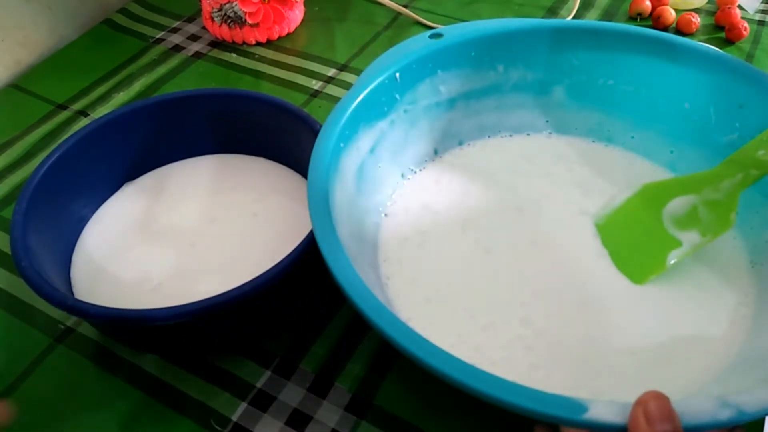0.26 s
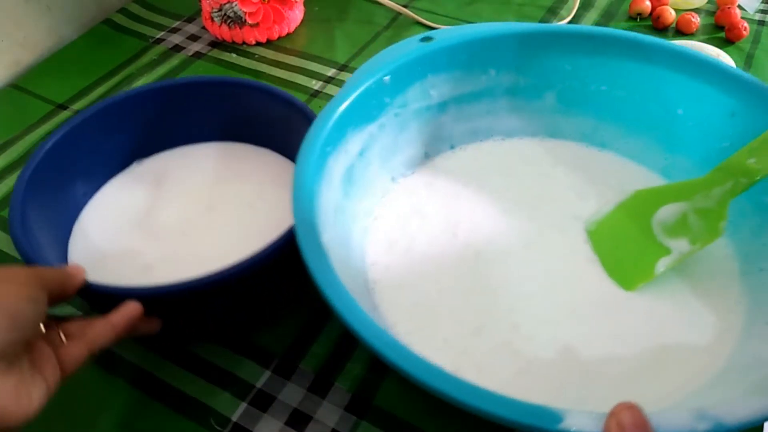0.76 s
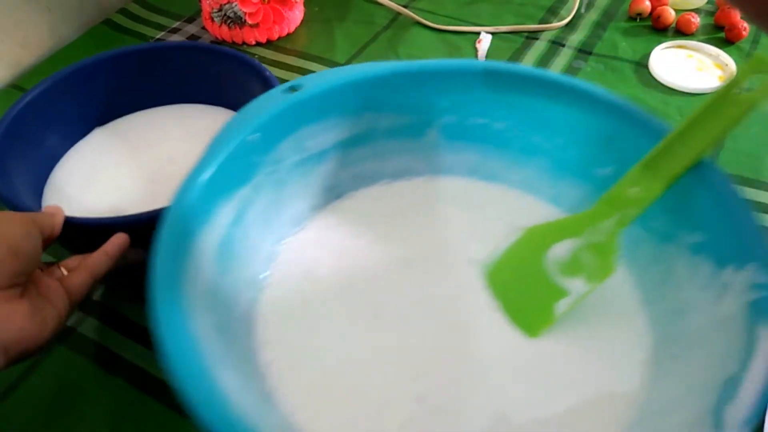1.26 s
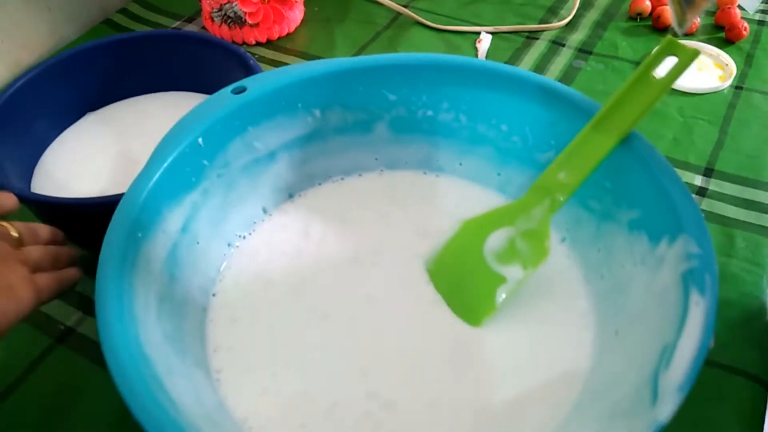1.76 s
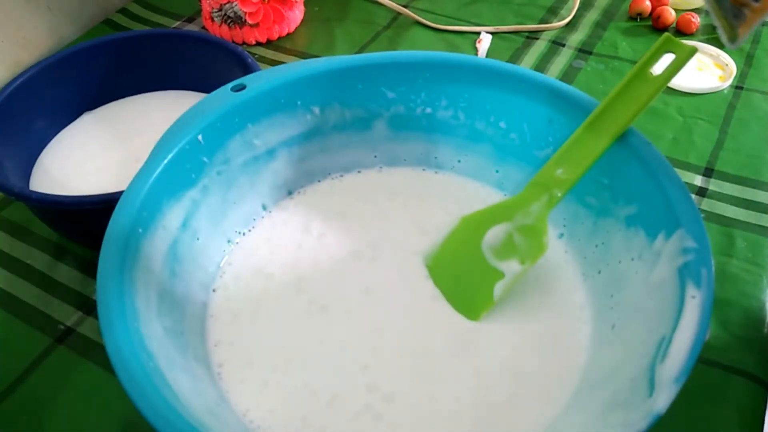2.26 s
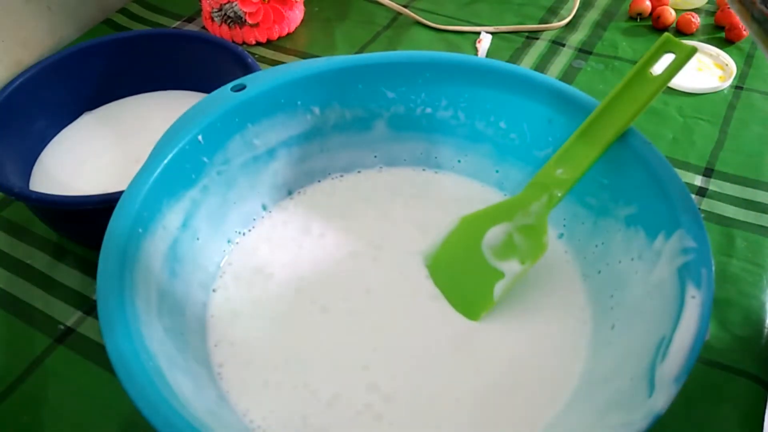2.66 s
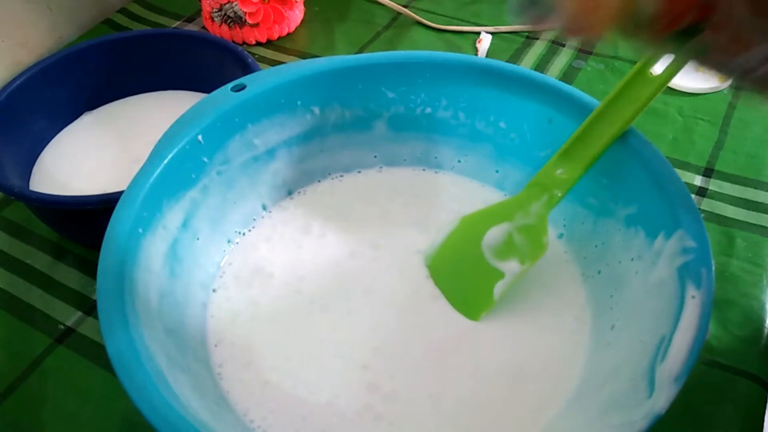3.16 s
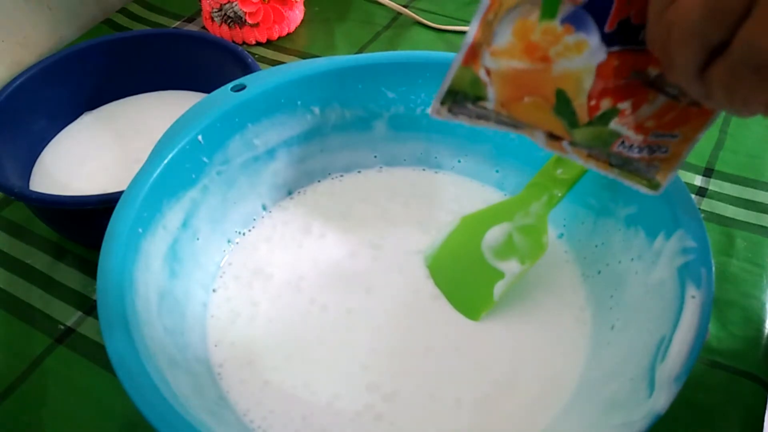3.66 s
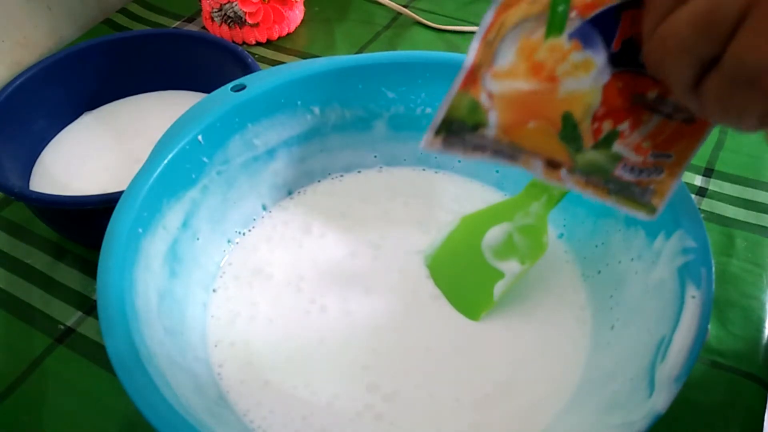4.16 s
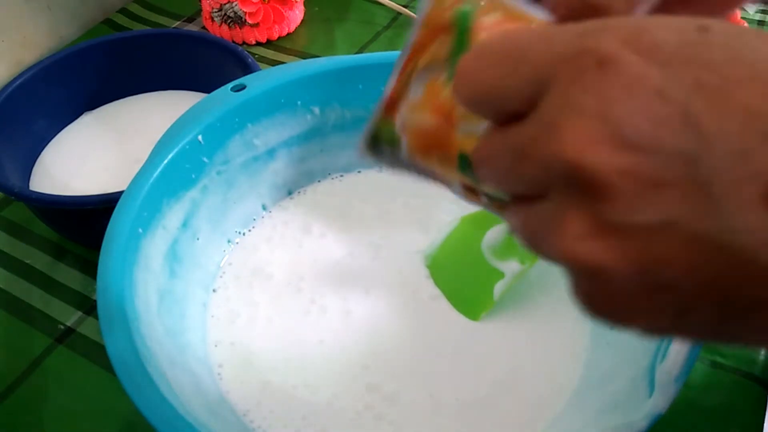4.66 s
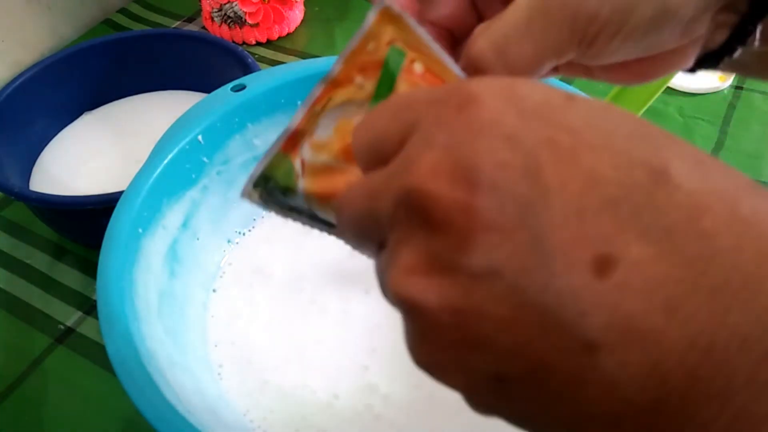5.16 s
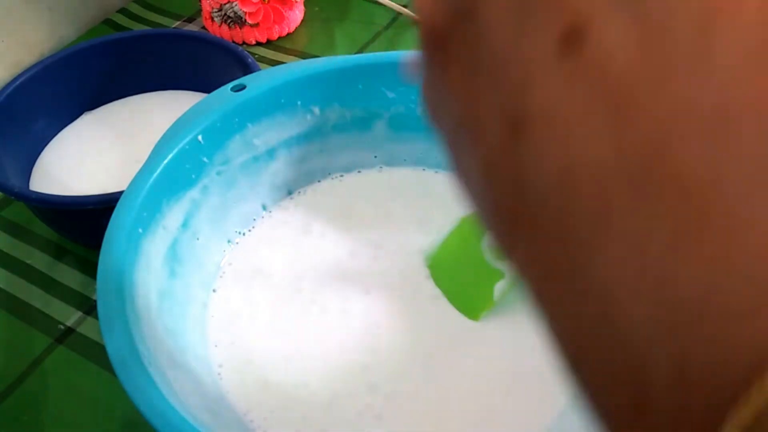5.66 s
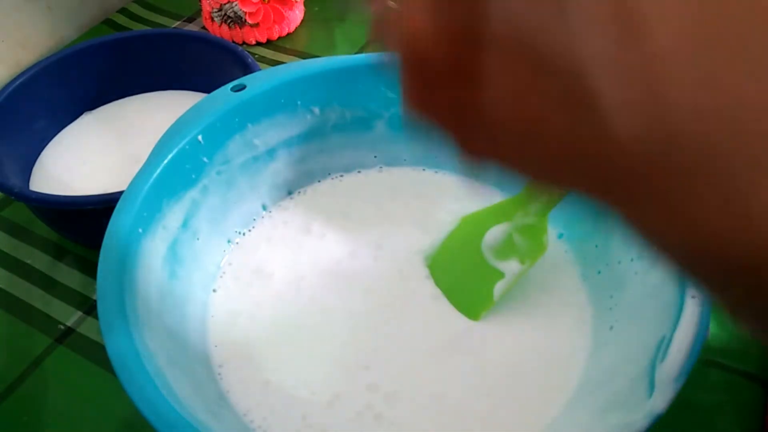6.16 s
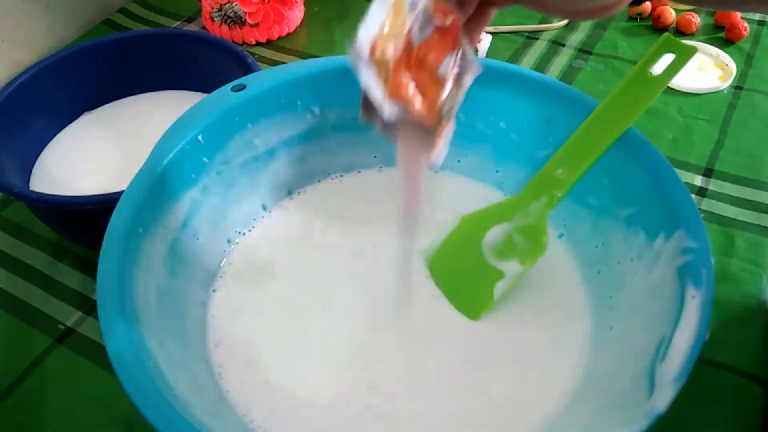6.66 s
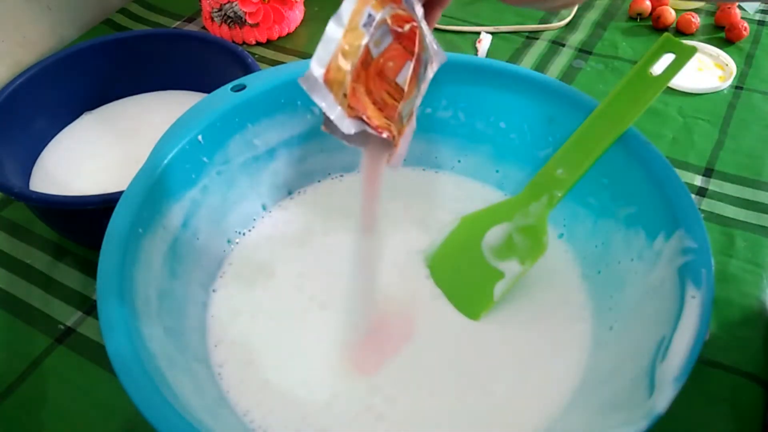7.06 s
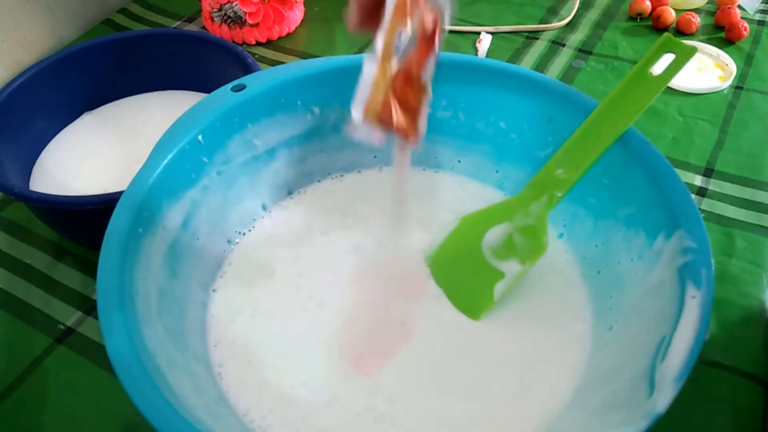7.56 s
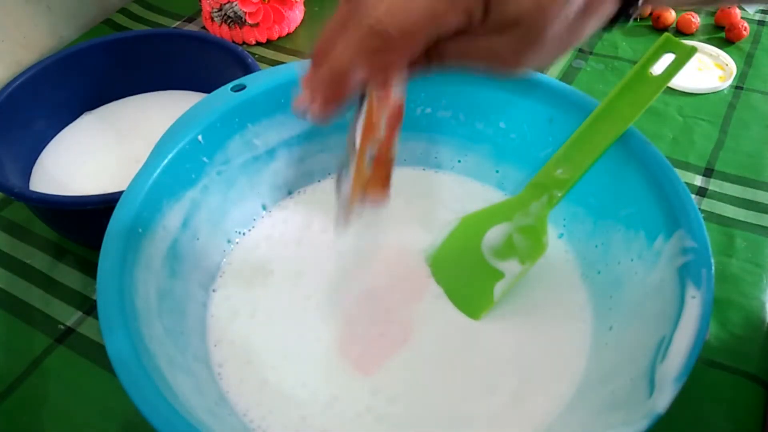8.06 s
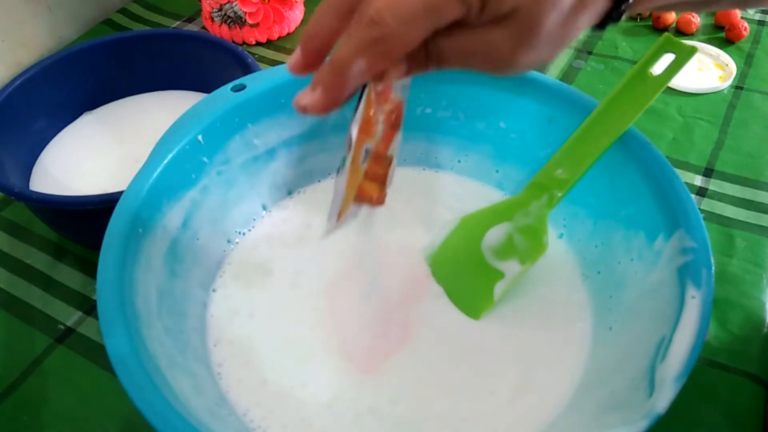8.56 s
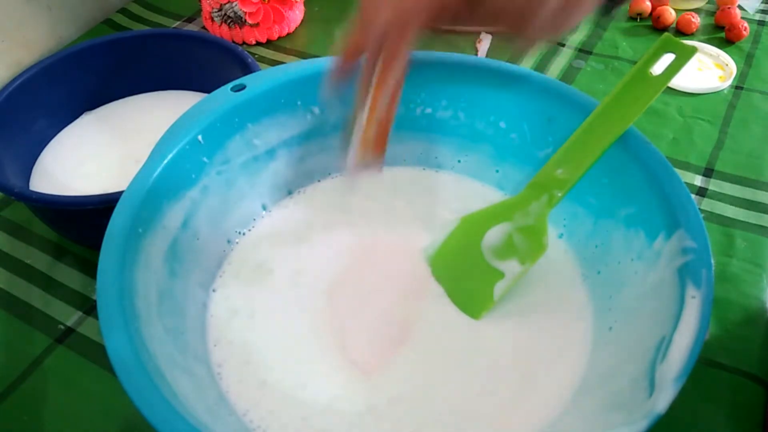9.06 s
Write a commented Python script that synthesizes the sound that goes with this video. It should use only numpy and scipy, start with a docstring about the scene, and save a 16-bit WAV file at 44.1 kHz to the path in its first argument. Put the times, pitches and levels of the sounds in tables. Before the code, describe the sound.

Short hollow bowl drag, busy bright foil crinkling and tearing, then fine powder streaming and being flicked from the sachet in a quiet kitchen.

```python
"""Bowl, foil sachet and powder

A plastic bowl is dragged over a mat: rough friction noise excites the modes of its walls.
A foil sachet is handled and torn open: each crease is an impulse that rings short modes of the sheet.
Powder streams out and is flicked out: dense grain impacts hiss, drum on the pouch and sound its spout.
A quiet kitchen adds reverberation, rumble and air; the whole is bright, with a strong lift near 9 kHz."""
import sys
import numpy as np
from scipy import signal
from scipy.fft import rfft, irfft, next_fast_len
from scipy.io import wavfile
from scipy.ndimage import uniform_filter1d, map_coordinates

SR = 44100
rng = np.random.default_rng(int(sys.argv[2]) if len(sys.argv) > 2 else 0)


def to_wav(sig):
    """Store sig (one row per channel, or 1-D mono) as 16-bit WAV at the path in sys.argv[1].

    Samples outside -1..1 are clipped; the rate is SR.
    """
    pcm = np.clip(np.atleast_2d(sig), -1, 1) * 32767
    pcm = np.round(pcm).astype(np.int16)
    wavfile.write(sys.argv[1], SR, pcm.T)  # frames by channels


N = 409688  # length [samples]


def amp(db):
    """Decibel law: level [dB] to amplitude gain."""
    return 10 ** (np.asarray(db) / 20)


def unit(x):
    """Normalization of a signal to rms 1."""
    return x / np.sqrt(np.mean(x ** 2) + 1e-20)


def along(points, hz):
    """Interpolation of (frequency [Hz], value) points on a logarithmic frequency axis."""
    f, v = np.transpose(points)
    return np.interp(np.log(hz + 1), np.log(f + 1), v)


def gains(rows):
    """Level envelopes: one gain per sample for each dB column, near silence outside the table."""
    times, *columns = np.transpose(rows)
    t = np.arange(N) / SR
    return [amp(np.interp(t, times, levels, left=-150, right=-150)) for levels in columns]


def swell(start, length, rise_db, fall_db):
    """Exponential growth to gain 1, a hold and exponential decay; slopes in dB/s, times in s."""
    t = np.arange(N) / SR
    before = np.clip(start - t, 0, None)
    after = np.clip(t - start - length, 0, None)
    return amp(-rise_db * before - fall_db * after)


def wobble(rate):
    """Slow random modulation: a smooth curve through normal draws, rate knots a second."""
    knots = rng.standard_normal(int(N * rate / SR) + 4)
    return map_coordinates(knots, [np.arange(N) * rate / SR])


def filtered(x, response):
    """Linear filtering: the spectrum of x times a complex response of frequency."""
    m = next_fast_len(N + SR // 2)
    return irfft(rfft(x, m) * response(np.fft.rfftfreq(m, 1 / SR)), m)[..., :N]


def colour(points):
    """Spectral shaping: the response of (frequency [Hz], gain [dB]) points."""
    return lambda hz: amp(along(points, hz))


def resonances(modes):
    """Modal sum: damped resonators (centre [Hz], width [Hz], gain [dB]) of alternating sign."""
    def response(f):
        total = 0
        for k, (centre, width, db) in enumerate(modes):
            damping = 1j * f * width
            total = total + (-1) ** k * amp(db) * damping / (centre * centre - f * f + damping)
        return total
    return response


def band(x, hz, ratio):
    """Band-pass filtering: x from hz / ratio to hz * ratio, rms 1."""
    b, a = signal.butter(2, [hz / ratio, hz * ratio], "band", fs=SR)
    return unit(signal.lfilter(b, a, x))


def struck(shape, carrier):
    """Energy conservation: the carrier under an envelope of height 1 keeps that envelope's energy."""
    return unit(shape * carrier) * np.sqrt(np.mean(shape ** 2)) / shape.max()


def crackle(rate, spread_db, life_s, smooth):
    """Shot noise: random impacts, rate a second, roughen a steady noise; the sum has rms 1."""
    sizes = amp(spread_db * np.clip(rng.standard_normal(N), -3, 2))
    hits = (rng.random(N) < rate / SR) * sizes
    bursts = signal.lfilter([1], [1, -np.exp(-1 / (life_s * SR))], hits)
    return unit((smooth + unit(bursts)) * rng.standard_normal(N))


def patchy(x, depth_db):
    """Time-frequency modulation: patches of random gain, some hundred Hz by some ten ms."""
    z = signal.stft(x, nperseg=512)[2]
    field = uniform_filter1d(rng.standard_normal(z.shape), size=8, axis=0)
    field = uniform_filter1d(field, size=8, axis=1)
    return signal.istft(z * amp(depth_db * unit(field)), nperseg=512)[1][:N]


def burst(t, lag, rise, t60):
    """Impact envelope: an exponential rise from the lag, then a 60 dB decay in t60 (all in s)."""
    return (t > lag) * (1 - np.exp(-np.abs(t - lag) / rise)) * amp(-60 * (t - lag) / t60)


# Creases of the foil and catches of the bowl:
# (time [s], crack level [dB], level of the sheet's body [dB], pitch of the sheet [Hz])
CREASES = [(0.606, -51, -40, 1930), (0.733, -52, -47, 1540), (0.998, -29.5, -28.5, 2530),
           (1.168, -23, -37, 3280), (1.229, -27, -46, 1030), (1.267, -14.5, -33, 1440),
           (1.3, -50, -35, 1500), (1.326, -31.5, -31, 3160), (1.408, -52, -40, 990),
           (1.464, -16.5, -28.5, 3000), (1.472, -18.5, -34, 1380), (1.479, -11.5, -29.5, 2030),
           (1.671, -18, -32, 3060), (1.717, -30, -48, 2320), (2.069, -50, -52, 3020),
           (2.094, -39.5, -47.5, 950), (2.158, -61, -46.5, 1040), (2.208, -56, -43, 940),
           (2.231, -50, -44, 1110), (2.26, -46, -41.5, 1000), (2.322, -51, -51.5, 3200),
           (2.421, -47.5, -46, 1060), (2.537, -68, -46, 1570), (2.585, -48.5, -39, 1610),
           (2.649, -71, -45.5, 1360), (2.714, -31.5, -37, 1390), (2.789, -30, -33, 1350),
           (2.809, -22.5, -45, 1430), (2.831, -50, -40, 1280), (2.838, -30, -35.0, 1100),
           (2.87, -38, -33, 1210), (2.891, -42, -35.5, 1020), (2.912, -22.5, -27.5, 4000),
           (2.942, -10.5, -30.5, 1480), (2.962, -45, -38, 1700), (2.969, -24.5, -34.5, 1940),
           (3.007, -34, -37, 2160), (3.02, -11, -31, 3970), (3.033, -23.5, -30, 2460),
           (3.038, -21, -35.5, 1210), (3.069, -10, -24.5, 1890), (3.096, -21, -33, 3230),
           (3.108, -36, -33, 1120), (3.16, -23.5, -31, 2810), (3.223, -30.5, -50, 2400),
           (3.466, -35, -34, 1750), (3.473, -36, -32.5, 1640), (3.503, -21, -23.5, 1440),
           (3.534, -30, -38, 875), (3.554, -38, -29.5, 2800), (3.566, -42, -29.5, 1700),
           (3.574, -18.5, -25, 2880), (3.59, -36, -35, 3030), (3.615, -19.5, -24, 2420),
           (3.624, -45, -36, 1400), (3.67, -22.5, -28.5, 2600), (3.786, -30, -30.5, 2950),
           (3.816, -41, -32.5, 1052), (4.01, -78.5, -41, 1400), (4.067, -31.5, -41.5, 1050),
           (4.082, -29.5, -34.5, 1720), (4.152, -21.5, -39.5, 3070), (4.183, -48.5, -34.5, 2700),
           (4.194, -13, -31, 1530), (4.218, -29.5, -33, 3000), (4.239, -24, -34.5, 2370),
           (4.266, -23, -52, 1870), (4.277, -27, -42, 1510), (4.285, -19.5, -38, 2620),
           (4.296, -26.5, -33, 1800), (4.31, -7.5, -30, 2520), (4.318, -14.5, -25, 2780),
           (4.412, -28.5, -37, 3450), (4.425, -50.5, -39, 1220), (4.431, -18.5, -28, 2580),
           (4.447, -39, -25.5, 3440), (4.452, -48, -37, 980), (4.464, -26, -21, 2600),
           (4.474, -44, -25, 1950), (4.479, -2.5, -21.5, 1550), (4.495, -35, -24.5, 1940),
           (4.577, -17.5, -26.5, 2820), (4.596, -18, -34, 2130), (4.644, -3, -17, 3830),
           (4.657, -12.5, -53, 2300), (4.668, -18, -20, 1330), (4.833, -28.5, -35, 2480),
           (4.859, -33, -36, 2330), (4.879, -26, -29.5, 1300), (4.902, -24, -39.5, 1020),
           (4.911, -19.5, -33.5, 2200), (4.951, -26.5, -45, 2360), (5.009, -37.5, -65, 2000),
           (5.019, -14.5, -28, 1680), (5.029, -23, -37, 1480), (5.042, -25, -30.5, 2060),
           (5.049, -53, -33.5, 1260), (5.054, -16, -33.5, 1340), (5.157, -21, -21.5, 2150),
           (5.168, -17.5, -20.5, 3620), (5.184, -52.5, -32.5, 1370), (5.223, -15, -26.5, 2550),
           (5.278, -34, -36.5, 3360), (5.38, -32, -50, 3430), (5.435, -36, -95, 890),
           (5.463, -25, -40.5, 2120), (5.477, -25, -27, 1990), (5.49, -24.5, -30.5, 1890),
           (5.563, -39, -38, 2000), (5.683, -65, -46, 1800), (5.693, -38.5, -41.5, 2390),
           (5.706, -26, -29, 1600), (5.716, -43, -33.5, 860), (5.735, -42, -33.5, 2200),
           (5.823, -30, -61, 1980), (5.876, -26, -35, 1370), (5.882, -17, -28.5, 3460),
           (5.955, -35, -38, 2450), (5.985, -55, -44, 2330), (6.002, -36, -62, 3080),
           (6.053, -21, -29, 2380), (6.061, -11, -33.5, 1110), (6.074, -37, -35.5, 1100),
           (6.08, -31, -37, 1530), (6.091, -38, -34, 1970), (6.109, -28, -27, 3000),
           (6.201, -44, -32, 2100), (6.682, -57, -56, 2730), (6.804, -36, -48, 910),
           (7.359, -35, -39, 2880), (7.438, -30.5, -79, 2220.0), (7.53, -38, -42.5, 1800),
           (7.544, -30, -47, 1320), (7.812, -42, -35, 2000), (7.856, -53, -48, 990),
           (7.87, -26.5, -27, 1610), (8.027, -54, -33, 1566), (8.797, -22, -57, 3075),
           (9.077, -48.5, -41.5, 2040), (9.139, -35, -70.5, 2130.0), (9.198, -15.5, -35, 1220),
           (9.21, -28, -31.5, 2640)]
# Spectrum of the bright crack: (frequency [Hz], gain [dB])
CRACK_SPECTRUM = [(1500, -34), (3000, -12.5), (5000, -9.5), (7000, -6.5), (9000, -5.5), (15000, -13)]
# Spectrum of the sheet's body: (frequency [Hz], gain [dB])
SHEET_SPECTRUM = [(250, -17.5), (500, -1), (1000, 0.5), (1500, -1), (2500, -3), (4000, -7.5), (6000, -11),
                  (9000, -13.5)]


def snaps():
    """Buckling: a crease gives way within a millisecond, cracks brightly and rings short sheet modes."""
    crack, body = np.zeros((2, N + SR))
    t = np.arange(SR // 20) / SR
    for s, crack_db, body_db, hz in CREASES:
        crack_noise, sheet_noise = rng.standard_normal((2, len(t)))
        lags, sizes, ratios = rng.random((3, 3))
        # weaker cracks 1 to 4 ms later
        after = sum(0.3 * size * burst(t, 0.001 + 0.003 * lag, 0.0003, 0.01) for lag, size in zip(lags, sizes))
        sharp = 1.3 * burst(t, 0, 0.0002, 0.0055)
        tail = 0.13 * burst(t, 0, 0.0015, 0.04)
        bright = struck(sharp + after + tail, crack_noise)

        upper = sum(0.54 * size * np.sin(2 * np.pi * hz * (0.88 + 1.5 * ratio) * t)
                    for size, ratio in zip(sizes, ratios))
        ring = np.sin(2 * np.pi * hz * t) + upper + 0.84 * band(sheet_noise, hz, 2.08)
        # an air pocket in the pouch [4050 Hz], rung by each crease to a random degree
        pocket = amp(-8) * ratios[0] * burst(t, 0.002, 0.004, 0.035) * np.sin(2 * np.pi * 4050 * t)
        dull = struck(burst(t, 0, 0.0006, 0.011) + 0.3 * after, ring) + pocket

        start = round(s * SR)
        crack[start:][:len(t)] += amp(crack_db) * bright
        body[start:][:len(t)] += amp(body_db) * dull
    return filtered(crack, colour(CRACK_SPECTRUM)) + filtered(body, colour(SHEET_SPECTRUM))


# Separate grips of the fingers on the foil:
# (start [s], length [s], rustle level [dB], level of the sheet's body [dB])
FOIL_GRIPS = [(2.228, 0.082, -78, -74), (2.791, 0.14, -55, -55), (3.009, 0.17, -50, -50.5),
              (3.533, 0.15, -52, -51), (4.2, 0.18, -55.5, -54.5), (4.468, 0.1, -50.5, -55),
              (4.664, 0.26, -54.5, -52.5), (5.003, 0.21, -75, -61), (5.24, 0.049, -55, -68),
              (5.481, 0.035, -57, -55), (5.728, 0.069, -77, -55.5), (5.88, 0.16, -60.5, -67),
              (6.073, 0.13, -56.5, -59.5), (6.218, 0.059, -65, -63)]
GRIP_DB_PER_S, LET_GO_DB_PER_S = 284, 210  # a grip tightens, then the foil falls quiet


def hands():
    """Superposition of many small creases that crackle between the loud ones."""
    rustle, body = np.zeros((2, N))
    for s, length, rustle_db, body_db in FOIL_GRIPS:
        grip = swell(s, length, GRIP_DB_PER_S, LET_GO_DB_PER_S)
        rustle += amp(rustle_db) * grip
        body += amp(body_db) * grip
    fine = crackle(300, spread_db=6, life_s=0.0015, smooth=0.7)
    coarse = crackle(170, spread_db=7, life_s=0.002, smooth=0.8)
    bright = rustle * unit(filtered(fine, colour(CRACK_SPECTRUM)))
    return bright + body * unit(filtered(coarse, colour(SHEET_SPECTRUM)))


# Powder running out: (time [s], hiss level [dB])
POWDER_STREAM = [(6.3, -61.5), (6.4, -65.5), (6.46, -59), (6.59, -56.5), (6.67, -59.5), (6.95, -46),
                 (7.2, -52.5), (7.61, -60.5), (7.95, -54), (8.08, -61), (8.12, -88)]
# Jolts that throw the powder against the foil: (time [s], surge level [dB], trickle after it [s])
POWDER_JOLTS = [(7.651, -49.5, 0.01), (7.811, -48.5, 0.098), (8.02, -56.5, 0.033), (8.127, -42, .05),
                (8.196, -35.5, .18), (8.466, -35.5, 0.082), (8.521, -33, 0.22), (8.804, -48, 0.049),
                (8.849, -38.5, 0.13), (8.907, -57, 0.03), (9.205, -57, 0.11)]
THROW_DB_PER_S, SURGE_S, SETTLE_DB_PER_S = 747, 0.016, 445  # a surge: up, at its height, down
# stragglers, relative to the surge, thin out; after the trickle the stop slope adds to the thinning
TRICKLE_DB, THINS_DB_PER_S, STOP_DB_PER_S = -9.5, 75, 496


def powder_flow():
    """Granular flow: the stream, a surge at every jolt and the stragglers behind it."""
    flow = gains(POWDER_STREAM)[0]
    for s, db, trickle in POWDER_JOLTS:
        surge = swell(s - SURGE_S / 2, SURGE_S, THROW_DB_PER_S, SETTLE_DB_PER_S)
        thinning = swell(s, 0, THROW_DB_PER_S, THINS_DB_PER_S)
        stragglers = thinning * swell(0, s + trickle, 0, STOP_DB_PER_S)
        flow = flow + amp(db) * (surge + amp(TRICKLE_DB) * stragglers)
    return flow


# Spectrum of the ticking grains: (frequency [Hz], relative level [dB])
GRAIN_SPECTRUM = [(1500, -41.5), (3000, -14.5), (5000, -8.5), (7000, -2), (9000, 0.5), (15000, -3.5)]
# Modes of the pouch panels: (frequency [Hz], width [Hz], relative level [dB])
POUCH_MODES = [(1093, 59, 10.5), (1640, 310, 10), (2290, 490, 12), (3440, 2300, 5)]
# Air in the torn pouch, one pass of two: (frequency [Hz], width [Hz], relative level [dB])
SPOUT_MODES = [(2110, 230, 1), (2540, 250, 4.5), (2770, 250, 9), (4280, 310, -3)]
# Air in the spout sounding: (time [s], level before random flutter [dB])
SPOUT_LEVEL = [(6.62, -95), (6.7, -72), (6.97, -60), (7.2, -70.5), (7.5, -78)]


def powder():
    """Impact excitation: dense grains tick on the foil, drum on the pouch and sound the spout's air."""
    flow = powder_flow()
    grains = amp(0.98 * wobble(70)) * crackle(3200, spread_db=4, life_s=0.0006, smooth=1.2)
    ticking = unit(patchy(filtered(grains, colour(GRAIN_SPECTRUM)), depth_db=1.5))
    # each panel of the pouch comes and goes as the foil bends
    pouch = sum(amp(3.5 * wobble(40)) * filtered(grains, resonances([mode])) for mode in POUCH_MODES)
    # harder shakes drum more than they hiss
    drum = amp(1.0) * flow ** 1.335 * unit(pouch)
    spout = resonances(SPOUT_MODES)
    flutter = amp(3 * wobble(28))
    whistle = gains(SPOUT_LEVEL)[0] * flutter * unit(filtered(grains, lambda f: spout(f) ** 2))
    return flow * ticking + drum + whistle


# Bowl sliding on the mat: (time [s], scrape level [dB], level of the bowl's body [dB])
BOWL_SLIDE = [(0.5, -99, -85), (0.64, -68, -71), (0.766, -60.5, -65.5), (0.898, -57.5, -57),
              (1.146, -52.5, -48), (1.34, -54, -44.5), (1.63, -57.5, -57), (1.808, -65, -65),
              (1.95, -109, -102)]
# Modes of the bowl's walls: (frequency [Hz], width [Hz], relative level [dB])
BOWL_MODES = [(298, 43, 3), (436, 29, 4), (748, 170, -4.5), (1004, 134, -3), (1460, 910, -9)]


def drag():
    """Friction excitation: the weave of the mat scrapes the base and shakes the bowl's walls."""
    scrape, shake = gains(BOWL_SLIDE)
    rub = crackle(1800, spread_db=11, life_s=0.002, smooth=2.4)
    scrape_spectrum = [(1000, 2.0), (2500, -17.5), (5000, -3), (8000, 2.5), (15000, 0.5)]  # (Hz, dB)
    fizz = unit(filtered(rub, colour(scrape_spectrum)))
    # each wall mode catches and slips on its own
    walls = sum(amp(3.5 * wobble(18)) * filtered(rub, resonances([mode])) for mode in BOWL_MODES)
    return scrape * fizz + shake * unit(walls)


# Soft knocks of fingers on the pouch and the bowl: (time [s], level [dB], pitch [Hz])
FINGER_KNOCKS = [(2.787, -41.5, 512), (3.461, -43, 435), (3.496, -32, 440), (6.802, -51.5, 610),
                 (7.806, -39.5, 460), (7.87, -38.5, 676), (8.028, -44, 790), (9.202, -35.5, 493)]


def knocks():
    """Damped oscillation: a soft contact rings one low mode with a little noise."""
    out = np.zeros(N + SR)
    t = np.arange(SR // 10) / SR
    shape = burst(t, 0, 0.0026, 0.043)
    for s, db, hz in FINGER_KNOCKS:
        puff = unit(uniform_filter1d(rng.standard_normal(len(t)), size=24))
        tone = np.sin(2 * np.pi * hz * t)
        out[round(s * SR):][:len(t)] += amp(db) * shape * (tone + 0.5 * puff)
    return out[:N]


# Reverberation of the kitchen: (frequency [Hz], time to decay by 60 dB [s])
KITCHEN_DECAY = [(300, 0.11), (2000, 0.39), (9000, 0.29), (15000, 0.04)]


def room(x):
    """Reverberation: each frequency dies at its own speed; a fresh random tail every quarter second."""
    out, step = np.zeros(N + SR), SR // 4
    delay = 350  # samples before the reverberation sets in
    for i in range(0, N, step):
        hz, t, z = signal.stft(rng.standard_normal(SR // 2), SR, nperseg=256)
        decay = amp(-60 * t / along(KITCHEN_DECAY, hz)[:, None])
        tail = signal.istft(z * decay, SR, nperseg=256)[1]
        wet = signal.fftconvolve(x[i:i + step], tail / np.linalg.norm(tail))
        out[i + delay:][:len(wet)] += wet
    return out[:N]


# Dull bumps through the floor: (time [s], level [dB])
FLOOR_BUMPS = [(.75, -64), (1.09, -65), (1.23, -49), (1.74, -61.5), (3.75, -65.5), (6.74, -63.5),
               (7.19, -65.5), (7.8, -59), (8.2, -63)]
# Tones a bump rings with: (frequency [Hz], relative level [dB])
FLOOR_TONES = [(61, 6.5), (92, -0.5)]
# Spectrum of the low rumble: (frequency [Hz], relative level [dB])
RUMBLE_SPECTRUM = [(20, -50), (40, -5), (62, -0.5), (100, -5), (165, -4.5), (200, -28), (300, -20),
                   (500, -78)]
# Spectrum of the still kitchen: (frequency [Hz], relative level [dB])
AIR_SPECTRUM = [(200, -1.5), (500, 0), (1000, -0.5), (2000, -6), (5000, -16), (15000, -28.5)]
# A faint hollow sound near 900 Hz: (start [s], length [s], level before random flutter [dB])
HOLLOW_SOUNDS = [(0.252, 0.1, -66), (5.646, 0.061, -56), (7.39, 0.31, -74)]
RUMBLE_DB, DRAG_RUMBLE_DB = -69, -23.5  # through walls and floor; the sliding bowl's, over its body
BUMP_RISE_DB_PER_S, BUMP_FALL_DB_PER_S = 174, 144.5
RING_DB = 3  # ring of the floor over the rumble of a bump


def background():
    """Structure-borne and airborne noise: low rumble in lumps, still air and the hollow sound."""
    bumps = sum(amp(db) * swell(s, 0, BUMP_RISE_DB_PER_S, BUMP_FALL_DB_PER_S) for s, db in FLOOR_BUMPS)
    bowl_body = gains(BOWL_SLIDE)[1]
    shaking = amp(RUMBLE_DB) + amp(DRAG_RUMBLE_DB) * bowl_body + bumps
    lumps = amp(3.5 * wobble(14)) * rng.standard_normal(N)
    rumble = shaking * unit(filtered(lumps, colour(RUMBLE_SPECTRUM)))

    t = np.arange(N) / SR
    # the phase of each floor tone wanders a little
    tones = sum(amp(db) * np.sin(2 * np.pi * hz * t + 0.38 * wobble(8.2)) for hz, db in FLOOR_TONES)
    ring = amp(RING_DB) * bumps * tones

    air = amp(-72.5) * unit(filtered(rng.standard_normal(N), colour(AIR_SPECTRUM)))

    level = sum(amp(db) * swell(s, length, rise_db=130, fall_db=91) for s, length, db in HOLLOW_SOUNDS)
    narrow = resonances([(922, 130, 0)])
    hollow_noise = unit(filtered(rng.standard_normal(N), lambda f: narrow(f) ** 2))
    hollow = level * amp(1.3 * wobble(30)) * hollow_noise
    return rumble + ring + air + hollow


# Left-right difference against the sum: (frequency [Hz], gain [dB])
STEREO_WIDTH = [(3000, -61.5), (3900, -47.5), (6000, -8), (9000, -3.5), (15000, -3)]


def scene():
    """Decorrelation: random phases make the treble differ left and right; sharp cracks stay more alike."""
    clicks = snaps() + knocks()
    spread = amp(-12) * room(clicks) + hands() + powder() + drag() + background()
    z = signal.stft(spread + 0.13 * clicks, nperseg=128)[2]
    random_phase = np.exp(2j * np.pi * rng.random(z.shape))
    shifted = signal.istft(z * random_phase, nperseg=128)[1][:N]
    side = filtered(shifted, colour(STEREO_WIDTH))
    middle = clicks + spread
    return np.array([middle + side, middle - side])


# Overall treble colour, a strong lift near 9 kHz and a steep fall above 14.2 kHz:
# (frequency [Hz], gain [dB])
TREBLE_COLOUR = [(5000, -2.5), (7000, -1), (8300, 6), (9100, 8.5), (10500, 3.5), (12000, 0.5), (14200, 2),
                 (14500, -28.5), (15600, -42.5)]
TOP_HZ = 15628  # band limit


def record(dry):
    """Spectral shaping and band limiting: the treble is coloured and nothing passes the limit."""
    return filtered(dry, lambda hz: amp(along(TREBLE_COLOUR, hz)) * (hz < TOP_HZ))


dry = scene()
out = record(dry)
to_wav(out)
```